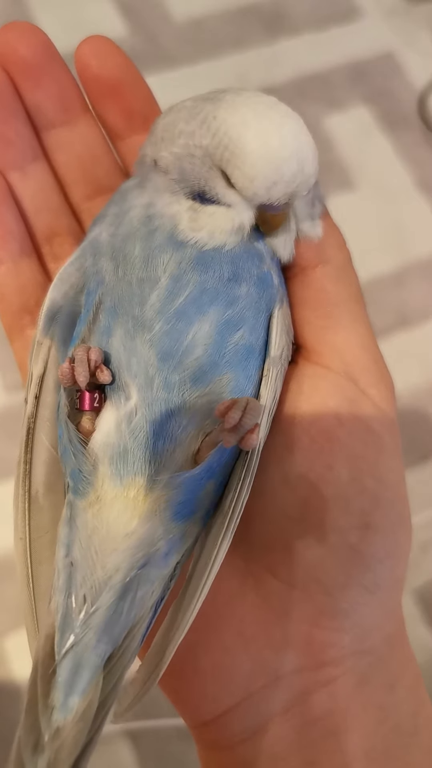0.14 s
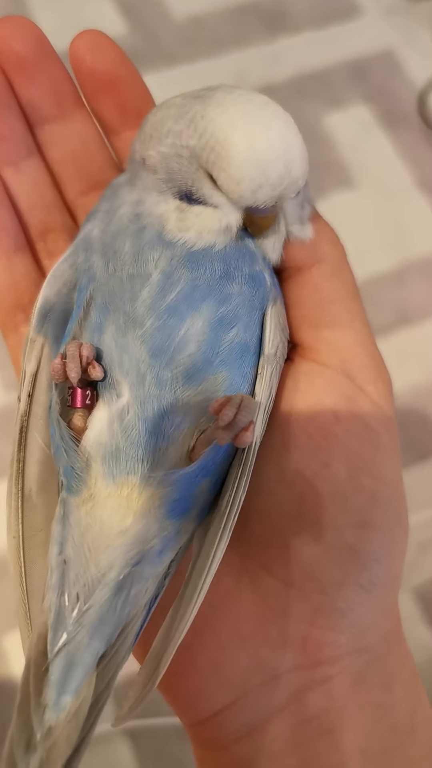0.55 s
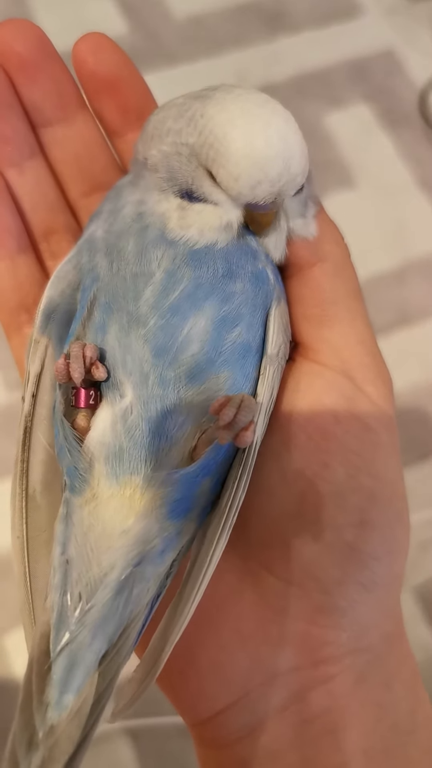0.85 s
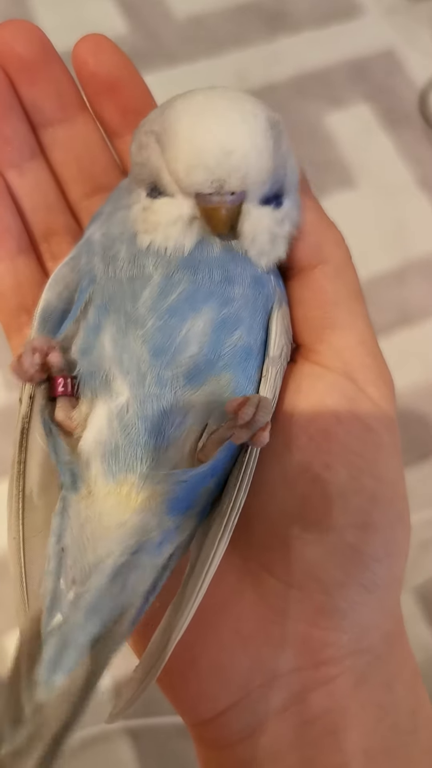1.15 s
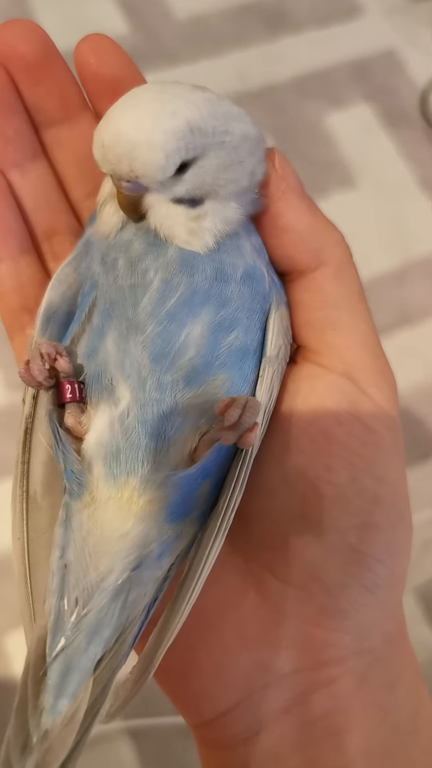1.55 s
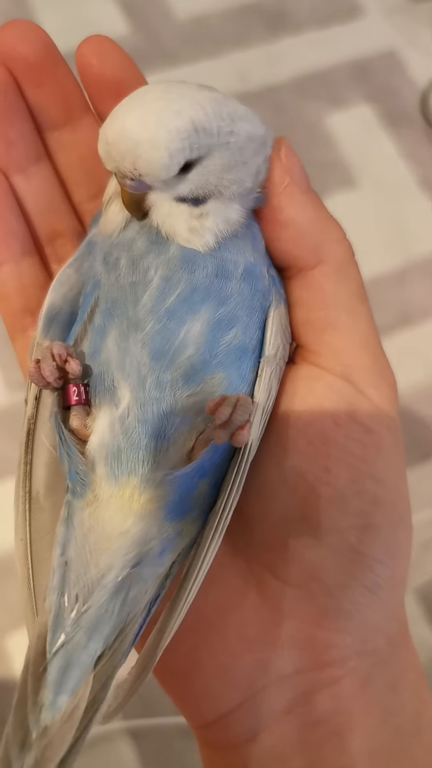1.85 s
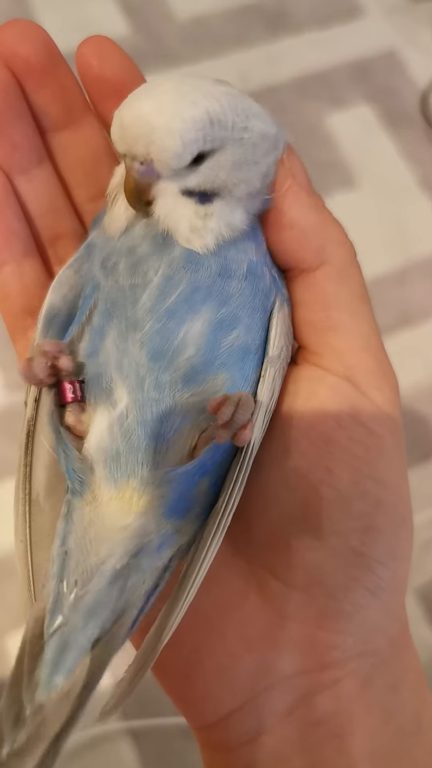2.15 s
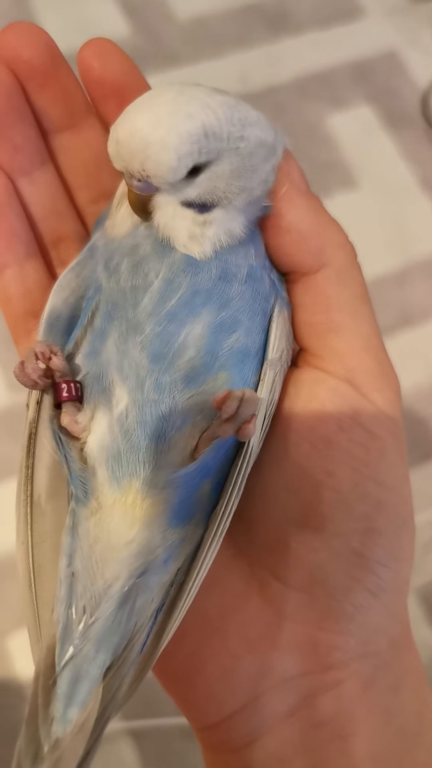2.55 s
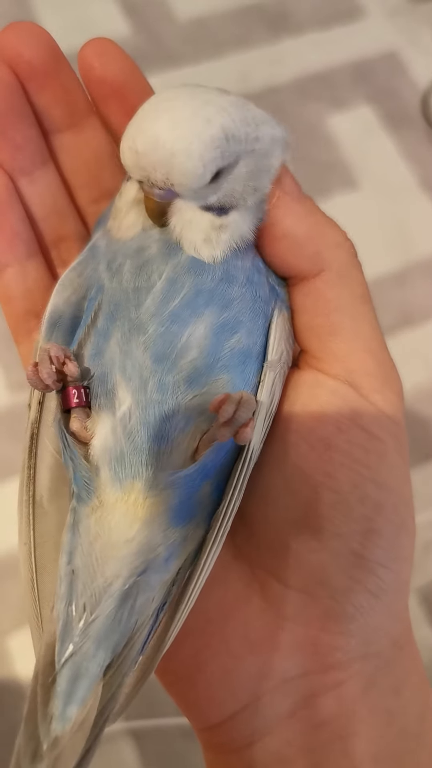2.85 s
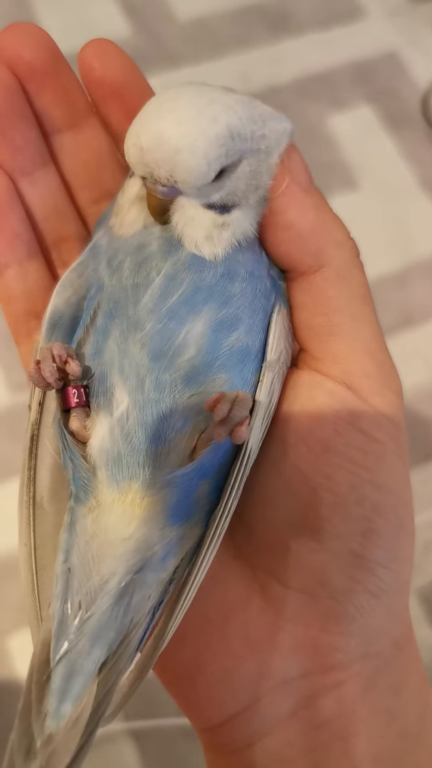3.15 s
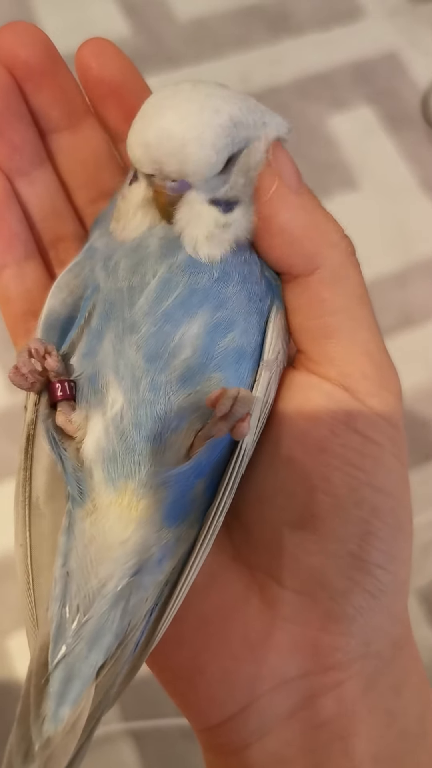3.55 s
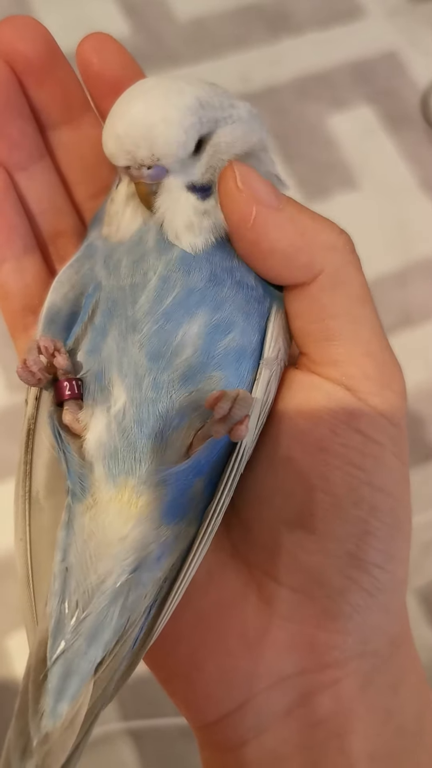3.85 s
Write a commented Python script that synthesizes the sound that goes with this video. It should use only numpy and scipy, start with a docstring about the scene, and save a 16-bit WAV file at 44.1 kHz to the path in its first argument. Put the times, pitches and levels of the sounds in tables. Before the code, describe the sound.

A budgie gives three short, sharp chirps close to the microphone, about a second apart, each falling in pitch. Faint rustles and a soft, hissy twitter come from further off in the quiet room.

```python
"""In a quiet room, a budgie held in a hand chirps three times close to a pair of microphones.
Its syrinx whistles each chirp as three joined notes: a stepped fall, a held note and a short closing fall.
The sound arrives directly, by close reflections and as a brief reverberant tail. Faint, short rustles
and a hissy twitter come from further off, and gain control ducks the room's hum at each chirp.
"""
import sys
import numpy as np
from scipy import signal
from scipy.fft import rfft, irfft
from scipy.io import wavfile
from scipy.ndimage import uniform_filter1d

SR = 44100
rng = np.random.default_rng(int(sys.argv[2]) if len(sys.argv) > 2 else 0)


def unload_audio(sound):
    """Save the sound as a 16-bit wav file, at the path given as the first command line argument."""
    columns = np.transpose(np.atleast_2d(sound))
    # keep every value between -1 and 1, then stretch to whole-number steps
    steps = np.round(np.clip(columns, -1, 1) * 32767)
    wavfile.write(sys.argv[1], SR, steps.astype(np.int16))


N = 176400
HZ, T = np.fft.rfftfreq(N, 1 / SR), np.arange(N) / SR


def amp(db):
    """Amplitude ratio of a level in decibels."""
    return 10 ** (np.asarray(db) / 20)


def unit(x):
    """Normalisation to an rms of 1."""
    return x / np.sqrt(np.mean(abs(x) ** 2) + 1e-20)


def curve(table, hz, column=1):
    """Interpolation of one table column along log frequency."""
    columns = np.transpose(table)
    return np.interp(np.log(hz + 1), np.log(columns[0] + 1), columns[column])


def wander(rate_hz):
    """Random modulation: low-passed Gaussian noise with zero mean and an rms of 1."""
    lowpass = np.exp(-(HZ / rate_hz) ** 2) * (HZ > 0)
    return unit(irfft(rfft(rng.standard_normal(N)) * lowpass, N))


def diffuse_field(spectra):
    """Sound from all around: spectra become a stereo signal whose balance depends on frequency."""
    # level difference between the microphones: frequency_hz, left_minus_right_db
    balance = [(60, -2.5), (350, -2), (700, 4), (2400, 4.5), (3300, 0.5), (4400, 2), (6800, -4), (9000, 13),
               (15000, 14)]
    return irfft(spectra * amp(np.outer([.5, -.5], curve(balance, HZ))), N)


def background():
    """Ambient noise, coherent between the microphones in the bass, with narrow bands of hum and whine."""
    # spectral density of the room noise: frequency_hz, relative_db
    density = [(15, -14), (40, -2), (65, -3), (113, -2), (222, -11), (319, -5), (367, -10.5), (434, -7.5),
               (738, -17), (1000, -16), (1330, -24), (2300, -26), (3500, -32.5), (5500, -36), (7520, -37.5),
               (8650, -37.5), (10800, -37.5), (16000, -47)]
    # likeness of left and right: frequency_hz, correlation
    coherence = [(60, 0.97), (180, 0.98), (550, 0.44), (1650, -0.02), (4970, -0.09), (15000, -0.78)]
    # hum and faint high whine: frequency_hz, level_db, width_hz
    hum_bands = [(47, -65.5, 5), (99, -70.5, 3), (300, -70, 26), (426, -73, 8.7), (8764, -90.5, 25),
                 (10804, -95.5, 60)]
    noise_db, swell_db, rise_db_per_s = -58, 0.67, 0.62
    left, independent = rfft(rng.standard_normal((2, N)))
    correlation = curve(coherence, HZ)
    right = correlation * left + np.sqrt(1 - correlation ** 2) * independent
    noise = unit(diffuse_field(np.array([left, right]) * amp(curve(density, HZ))))
    hum = np.zeros(N)
    for hz, db, width_hz in hum_bands:
        wavering = wander(width_hz) + 1j * wander(width_hz)
        hum += amp(db) * np.sqrt(2) * unit(wavering * np.exp(2j * np.pi * hz * T)).real
    envelope = amp(noise_db + rise_db_per_s * T + swell_db * wander(4))
    return envelope * noise + diffuse_field(rfft(hum))


def distant_twitter():
    """Reverberation smears far-off calls, so each is modelled as a gliding band of noise."""
    # soft calls: start_s, length_s, first_hz, last_hz, width_hz, level_db
    calls = [(0.198, 0.59, 3690, 3340, 800, -69.5), (0.083, 0.7, 2390, 2300, 300, -74),
             (0.737, 0.35, 3514, 3620, 600, -71.5), (1.58, 0.5, 3240, 2780, 646, -61),
             (1.698, 0.32, 3830, 4250, 700, -65.5), (1.874, 0.145, 2685, 2486, 447, -58),
             (2.58, 0.31, 3980, 3690, 575, -54.5), (2.638, 0.43, 3503, 3070, 745, -55)]
    twitter = np.zeros((2, N))
    for start, length, first_hz, last_hz, width_hz, db in calls:
        progress = np.clip((T - start) / length, 0, 1)
        carrier = np.exp(2j * np.pi * np.cumsum(first_hz + (last_hz - first_hz) * progress) / SR)
        noise = rng.standard_normal((2, N)) + 1j * rng.standard_normal((2, N))
        baseband = signal.sosfilt(signal.butter(3, width_hz / 2, fs=SR, output="sos"), noise)
        envelope = np.sin(np.pi * progress ** 0.81) * (1 - progress / 2)
        twitter += amp(db) * envelope * unit((baseband * carrier).real)
    return diffuse_field(rfft(twitter))


def distant_rustles():
    """Faint, short, high rustles from further off in the room arrive as bursts of diffuse noise."""
    # rustles: peak_s, rise_s, fall_s, level_db
    rustles = [(0.342, 0.044, .09, -68), (1.915, .02, .06, -59), (2.06, 0.018, 0.042, -50),
               (2.63, .02, 0.056, -66), (2.725, .03, 0.058, -65.5), (3.615, .02, 0.069, -55.5)]
    # rustle spectrum: frequency_hz, relative_db
    spectrum = [(1000, -23), (1800, -16), (2350, 2), (3100, -13), (4300, -5.5), (6500, -7), (8000, -4.5),
                (9400, -0.5), (12000, -7.5), (13800, -15), (15800, -11)]
    grain_db, grain_s = 0.5, .0008
    envelope = sum(amp(db) * np.exp(-np.maximum((peak - T) / rise, (T - peak) / fall))
                   for peak, rise, fall, db in rustles)
    grains = rng.standard_normal((2, N)) * amp(grain_db * wander(1 / grain_s))
    return envelope * unit(diffuse_field(rfft(grains) * amp(curve(spectrum, HZ))))


def reverberation(bird):
    """Convolution with the room's diffuse tail, whose exponential decay is fastest in the high treble."""
    # room response: frequency_hz, relative_db, t60_s
    response = [(1000, -5, 0.34), (2500, -0.5, 0.47), (3400, -2, 0.51), (5010, -3.5, .36), (6800, -2, 0.45),
                (9500, -6.5, 0.37), (12850, -18, .16)]
    reverb_db, build_up_s = -20.5, 0.0084
    hz, t, noise = signal.stft(rng.standard_normal((2, SR)), SR, nperseg=256)
    decay = amp(-60 * t / curve(response, hz, column=2)[:, None])
    tail = signal.istft(noise * decay, SR, nperseg=256)[1][:, :SR]
    tail *= 1 - np.exp(-T[:SR] / build_up_s)
    tail /= np.linalg.norm(tail[0])
    return diffuse_field(rfft(bird) * rfft(tail, N) * amp(reverb_db + curve(response, HZ)))


def early_sound(bird, pan_db):
    """The direct wave interferes with close reflections; the turn of the head sets the balance."""
    # transfer from beak to microphones: frequency_hz, left_db, right_db
    path = [(1620, -6, -8.5), (2280, -1.5, -10), (2648.4, 0.5, -12.5), (2950, -6.5, -3.5), (3250, -1, 2),
            (3670, 2.5, 1), (4300, -2, -0.5), (5100, -4, 1), (6000, -8.5, -0.5), (6500, -7.5, -5.5),
            (6650, 3.5, 5), (7500, -7.5, -9), (8200, 3, -10.5), (9170, 7.5, -15.5), (10060, 2.5, -24.5),
            (11100, -2, -33.5), (13300, -10.5, -37), (14700, 2.5, -22), (16000, 0, -28.5)]
    # reflections from nearby surfaces: delay_s, left_db, right_db
    reflections = [(.0034, -23.5, -28), (.0061, -25, -23.5), (.0093, -24.5, -22.5)]
    left_lead_s = .00027
    colour = amp([curve(path, HZ, column=1), curve(path, HZ, column=2)])
    direct = np.exp(2j * np.pi * np.outer([left_lead_s, 0], HZ))
    echoes = sum(amp([[left], [right]]) * np.exp(-2j * np.pi * HZ * delay)
                 for delay, left, right in reflections)
    panned = bird * amp(np.outer([1, -1], pan_db))  # left is raised, right lowered
    return irfft(rfft(panned) * colour * (direct + echoes), N)


def chirp_contours():
    """Frequency and amplitude modulation: three notes join into each chirp's control curves."""
    # opening falls, held notes, closing falls: start_s, length_s, pitch_hz, level_db, pan_db, rasp_db
    openings = [(1.0772, .059, 3579, -2, -0.5, -27), (2.2138, .0605, 3656, -2, 1, -32),
                (3.3358, .063, 3691, -1, .5, -34.5)]
    holds = [(1.1355, .0475, 3349, -0.5, 1, -17.5), (2.2755, .0485, 3358, 1, 1.5, -30),
             (3.398, .0475, 3350, 1, 1.5, -22.5)]
    closings = [(1.183, .029, 2940, -3, -0.5, -21), (2.3235, .035, 2994, -0.5, 2, -33),
                (3.4452, .037, 2962, 0.5, 0, -30)]
    # course of each kind of note: length_fraction, pitch_ratio, relative_db, roughness (0 to 1)
    opening_shape = [(0, 1.3, -21.5, .9), (.08, 1.03, -26, .3), (.17, 1.015, -16, .25),
                     (0.229, 1.005, -2.5, .25), (.4, .99, -2, .2), (.5, .89, -1.5, .15),
                     (.73, .835, 1.5, .3), (.86, 0.69, -4, 0.4), (1, 0.68, -6, 1)]
    hold_shape = [(0, .87, -5, 0.64), (.09, .97, -2, .35), (.24, .997, -2.5, .12), (.65, 1.004, 1, .12),
                  (.94, 1.002, -3, .12), (1, 1.08, -6.5, .5)]
    closing_shape = [(0, 1.03, 3, .5), (.2, 1.005, -2, .35), (.55, .98, -1.5, .35), (0.781, .84, -5, .6),
                     (1, 0.72, -14.5, 0.66)]
    edge_s = 0.00066
    pitch, envelope, roughness, pan_db, rasp_gain = np.zeros((5, N))
    for notes, shape in ((openings, opening_shape), (holds, hold_shape), (closings, closing_shape)):
        fraction, pitch_ratio, relative_db, note_roughness = np.transpose(shape)
        for start, length, hz, db, note_pan_db, rasp_db in notes:
            t = np.arange(0, length, 1 / SR)
            span = round(start * SR) + np.arange(len(t))
            fade = np.clip(np.minimum(t, length - t) / edge_s, 0, 1)
            pitch[span] = hz * np.interp(t / length, fraction, pitch_ratio)
            envelope[span] = amp(db + np.interp(t / length, fraction, relative_db)) * fade
            roughness[span] = np.interp(t / length, fraction, note_roughness)
            pan_db[span], rasp_gain[span] = note_pan_db, amp(rasp_db)
    pitch = np.interp(T, T[pitch > 0], pitch[pitch > 0])  # glide across the gaps
    return pitch, uniform_filter1d(envelope, size=30), roughness, pan_db, rasp_gain


def syrinx(pitch, envelope, roughness, rasp_gain):
    """A nearly periodic oscillation whistles; jitter, shimmer, rasp and hiss grow at pitch breaks."""
    # harmonics from the fundamental up: level_db
    harmonics = [-3, -22.5, -25, -32, -43]
    # spectrum of the air's hiss: frequency_hz, relative_db
    air_spectrum = [(500, -33.5), (1500, -24), (2500, -3), (3500, -0.5), (5000, -3), (7000, -6),
                    (9500, -0.5), (12000, -9), (16000, -16)]
    jitter_depth, shimmer_depth, roughness_hz, drift_depth = .03, .12, 901.2, 0.0078
    flutter_db, flutter_hz, rasp_rate_hz, hiss_db = 3.5, 69.7, 350, -30.5
    jitter = jitter_depth * roughness * wander(roughness_hz)
    drift = drift_depth * wander(rate_hz=140)
    phase = 2 * np.pi * np.cumsum(pitch * (1 + jitter + drift)) / SR
    whistle = np.zeros(N)
    for k, db in enumerate(harmonics, 1):
        swell_db = (k > 1) * flutter_db * wander(flutter_hz)  # each overtone flutters on its own
        whistle += amp(db + swell_db) * np.sin(k * phase) * (k * pitch < SR / 2)
    half_harmonics = sum(np.sin((k + .5) * phase) / k for k in range(1, 4))
    rasp = rasp_gain * roughness * wander(rasp_rate_hz) * half_harmonics
    air = unit(irfft(rfft(rng.standard_normal(N)) * amp(curve(air_spectrum, HZ)), N))
    hiss = amp(hiss_db) * air * np.sqrt(abs(envelope * roughness))
    shimmer = 1 + shimmer_depth * roughness * wander(roughness_hz)
    return envelope * (whistle + rasp) * shimmer + hiss


def scene():
    """Superposition of the bird, its reverberation and the quieter sources at the microphones."""
    pitch, envelope, roughness, pan_db, rasp_gain = chirp_contours()
    bird = syrinx(pitch, envelope, roughness, rasp_gain)
    chirps = early_sound(bird, pan_db) + reverberation(bird)
    return chirps + distant_rustles() + distant_twitter() + background()


def record(dry):
    """Automatic gain control drops fast above a threshold and recovers slowly; a low-pass follows."""
    threshold_db, attack_s, recovery_db_per_s, cutoff_hz = -12, 0.017, 26, 15900
    power = uniform_filter1d((dry ** 2).mean(0), size=200)
    power_db = 10 * np.log10(abs(power) + 1e-12)
    recovery_db = T * recovery_db_per_s
    held_peak_db = np.maximum.accumulate(power_db + recovery_db) - recovery_db
    excess_db = np.maximum(held_peak_db - threshold_db, 0)
    pole = np.exp(-1 / (attack_s * SR))
    ducked = dry / amp(signal.lfilter([1 - pole], [1, -pole], excess_db))
    lowpass = signal.firwin(511, cutoff_hz, window=("kaiser", 9), fs=SR)
    return signal.oaconvolve(ducked, lowpass[None], "same")


dry = scene()
out = record(dry)
unload_audio(out)
```